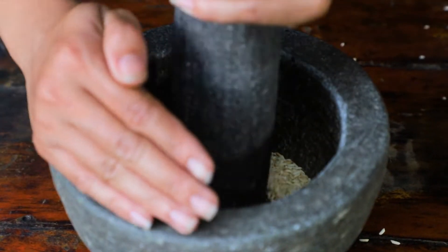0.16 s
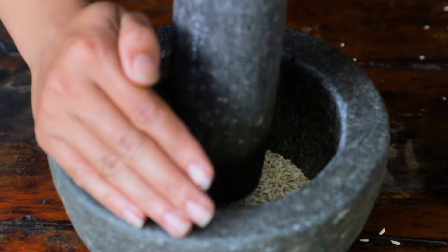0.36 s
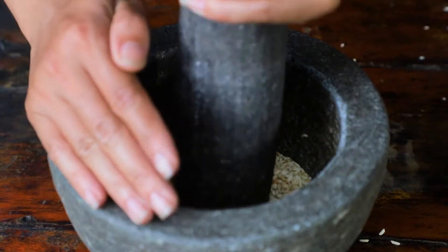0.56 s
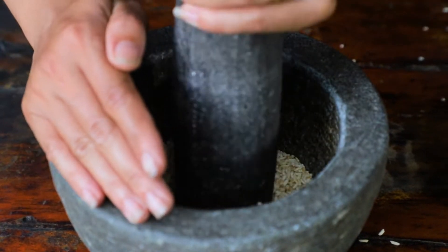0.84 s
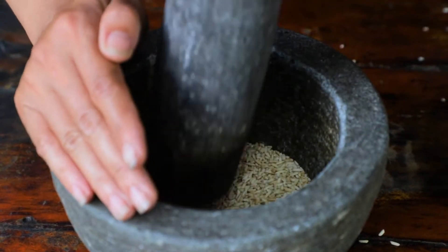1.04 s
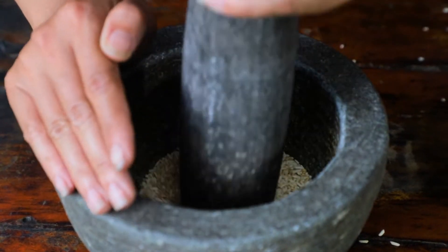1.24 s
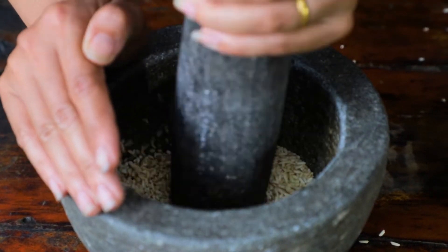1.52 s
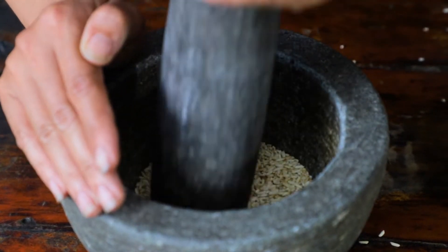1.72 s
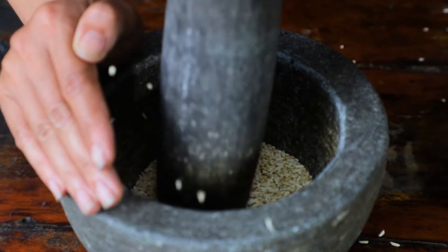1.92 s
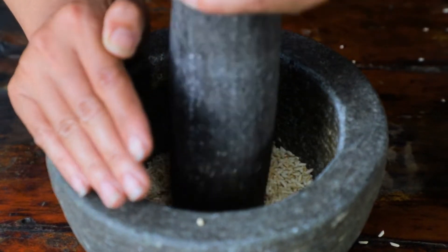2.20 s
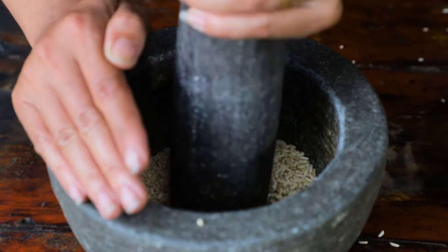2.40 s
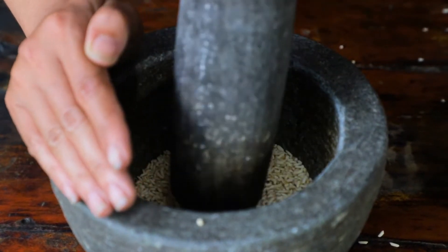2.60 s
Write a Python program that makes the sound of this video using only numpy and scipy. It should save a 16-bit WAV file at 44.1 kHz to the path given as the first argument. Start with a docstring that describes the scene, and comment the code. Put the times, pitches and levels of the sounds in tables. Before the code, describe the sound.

A stone pestle pounds dry grain in a stone mortar, three gritty thuds a second, with two sharp hollow clacks, small clinks and low wind thumps on a close microphone, slight short room echo.

```python
"""A stone pestle pounds dry grain in a stone mortar on a wooden table, about three blows a second, close by.
Each blow mixes a crackle of breaking grain with jolts that ring mortar, table and pestle.
Wind thumps the microphone as filtered clicks and single puffs, over a flickering noise hiss with small drops.
Something hard and hollow clacks nearby and something smaller clinks, as noise snaps with decaying modes.
Stray grains tick as short tones; the knocks get a short room echo, and the loudest hits overload the input."""
import sys
import numpy as np
from scipy import signal
from scipy.fft import rfft, irfft
from scipy.io import wavfile

SR = 44100
rng = np.random.default_rng(int(sys.argv[2]) if len(sys.argv) > 2 else 0)


def bounce(signal):
    """Save signal as a 16-bit WAV file at the path given by the first command-line argument."""
    frames = np.transpose(np.atleast_2d(signal))
    limited = np.clip(frames, -1, 1)
    pcm = np.round(limited * 32767).astype(np.int16)
    wavfile.write(sys.argv[1], SR, pcm)


def boost_factor(decibels):
    """Convert a level in decibels to a linear amplitude factor."""
    exponent = np.asarray(decibels, float) / 20
    return 10 ** exponent


N = 121275
LEAD = 4096  # samples made before time 0, so that a blow can already be under way
T = np.arange(-LEAD, N) / SR


def level(x, db):
    """Scales a sound to an rms level in dB."""
    return x * boost_factor(db) / np.sqrt(np.mean(x ** 2))


def colour(x, points):
    """Filters a sound along a curve of (Hz, dB) points."""
    hz, db = np.array(points, float).T
    f = np.fft.rfftfreq(len(x), 1 / SR) + 1
    gain = boost_factor(np.interp(np.log(f), np.log(hz), db))
    return irfft(rfft(x) * gain, len(x))


def ring(hz, db, t60, size=8192):
    """Response of a set of decaying modes to one tap; t60 is the time in seconds to fade by 60 dB."""
    t = np.arange(size) / SR
    hz, db, t60 = (np.reshape(v, (-1, 1)) for v in (hz, db, t60))
    decay = np.exp(-np.log(1000) * t / t60)
    return (boost_factor(db) * np.sin(2 * np.pi * hz * t) * decay).sum(axis=0)


def clicks(rate, spread_db, size):
    """Clicks of either sign at random moments, rate per second, with random sizes."""
    when, sign, big = rng.random((3, size))
    sizes = boost_factor(-spread_db * np.log(1 - big))
    return (when < rate / SR) * np.sign(sign - .5) * sizes


def add(out, s, x):
    """Mixes x into out from time s in seconds."""
    i = int(round(s * SR)) + LEAD
    out[i:i + len(x)] += x[:len(out) - i]


# The blows of the pestle. Each row: start in seconds, length of the crush in seconds, crackle level in dB
# before the press shapes it, thud level in dB rms, peak of the pestle's ring in dB.
BLOWS = [(-.045, 0.02, -28, -21, -42), (0.262, 0.028, -28, -16, -21.5), (0.58, 0.027, -28, -15, -20.5),
         (0.888, 0.029, -27.5, -19, -29), (1.221, 0.024, -22.5, -14.5, -26), (1.572, 0.025, -27, -14, -44),
         (1.86, 0.021, -25.5, -12.5, -17), (2.188, 0.011, -21.5, 4, -19), (2.487, 0.029, -27, -19.5, -28)]
# The tone of breaking grain, also used for the snap of a knock. Each row: frequency in Hz, relative level in dB.
CRUNCH = [(880, -4), (1500, -18), (2100, -11.5), (2760, -2), (3400, -1.5), (3800, -6.5), (4200, -5),
          (5000, -4.5), (6690, -11.5), (8770, -10), (12200, -14.5), (15200, -12), (16300, -42)]
# The ways mortar and table ring. Each row: frequency in Hz, relative level in dB, fade time t60 in seconds.
MORTAR = [(140.2, -0.5, 0.11), (233.4, -0.5, 0.056), (307.5, 5.5, 0.04), (380.4, 6, 0.035),
          (429, -4.5, 0.066), (575, -11.5, 0.11), (661, -10.5, 0.063), (774, -15.5, 0.15),
          (895, -11.5, 0.076), (970, -9.5, 0.065), (1171, -10.5, 0.09), (1304, -11, 0.089)]
CRUSH_RISE_S, CRUSH_FALL_S = 0.011, 0.004
CRUSH_SAG = 0.15  # share of the crackle lost while pressing
SETTLE_S, SETTLE_DB = 0.022, -7.5  # slower tail of settling grain
LUMP_DB = 3.5  # grains give way in lumps
CRACKS_PER_S, CRACK_SPREAD_DB = 5000, 0.5
JOLTS_PER_S, JOLT_SPREAD_DB, THUD_LATE_S = 2200, 1.5, 0.0065
SINK, ROCK = 0.6, 0.61  # shares of the crush: jolts grow over the first, then die away at the pace of the second
DETUNE = 0.041  # each tone of a mode's group is detuned at random by about this share, roughening the thud
BITE, SOFT_DB = 0.38, -10  # thuds above SOFT_DB reach stone: dB per octave brighter for each dB above
PESTLE_HZ, PESTLE_T60_S = 4120, 0.06


def grain_crush(t, after, length, crunch_db):
    """Grain cracks at random moments while the pestle presses in, then settles; after is time since the crush."""
    rise = np.minimum(t / min(CRUSH_RISE_S, length / 2), 1) ** 2
    press = rise * (1 - CRUSH_SAG * np.minimum(t / length, 1))
    crush = press * (np.exp(-after / CRUSH_FALL_S) + boost_factor(SETTLE_DB) * np.exp(-after / SETTLE_S))
    knots = t[::128]
    lumps = np.interp(t, knots, rng.standard_normal(len(knots)))
    cracks = clicks(CRACKS_PER_S, CRACK_SPREAD_DB, size=len(t))
    return crush * boost_factor(LUMP_DB * lumps) * level(colour(cracks, CRUNCH), crunch_db)


def mortar_thud(t, jolts, length, thud_db):
    """Jolts set off the modes of mortar and table; a harder blow excites more of the high ones."""
    hz, db, t60 = np.repeat(MORTAR, 6, axis=0).T  # each mode is a close group of six tones
    bite = BITE * max(thud_db - SOFT_DB, 0) * np.log2(hz / hz[0])
    detune = 1 + DETUNE * rng.standard_normal(len(hz))
    thud = signal.fftconvolve(jolts, ring(hz * detune, db + bite, t60))[:len(t)]
    thud = signal.sosfilt(signal.butter(2, 90, "high", fs=SR, output="sos"), thud)
    return thud * boost_factor(thud_db) / np.sqrt(np.mean(thud[t < length + .02] ** 2))


def pestle_ring(t, jolts, length, ring_db):
    """The jolts during the crush make the pestle ring thinly at one pitch."""
    pestle = signal.fftconvolve(jolts * (t < length), ring(PESTLE_HZ, 0, PESTLE_T60_S))[:len(t)]
    return pestle * boost_factor(ring_db) / np.abs(pestle).max()


def blows():
    """Each blow cracks grain as the pestle sinks in, and its uneven jolts shake mortar, table and pestle."""
    out, t = np.zeros(len(T)), np.arange(8192) / SR
    for s, length, crunch_db, thud_db, ring_db in BLOWS:
        after = np.maximum(t - length, 0)
        crunch = grain_crush(t, after, length, crunch_db)
        sunk = np.clip((t - min(THUD_LATE_S, length / 4)) / (SINK * length), 0, 1)
        rocking = np.exp(-after / (ROCK * length))
        jolts = sunk * rocking * clicks(JOLTS_PER_S, JOLT_SPREAD_DB, size=len(t))
        thud = mortar_thud(t, jolts, length, thud_db)
        add(out, s, crunch + thud + pestle_ring(t, jolts, length, ring_db))
    return out


# Strong puffs of wind. Each row: time in seconds, size in dB, half width in seconds, push +1 or pull -1.
PUFFS = [(1.002, -15.5, 0.0068, 1), (1.089, -7, 0.0028, 1), (1.108, -5.5, 0.0044, 1),
         (1.13, -14, 0.0029, 1), (1.169, -8, 0.0037, 1), (1.208, -16, 0.015, -1), (1.34, -18, 0.0093, 1),
         (1.408, -11.5, 0.0063, -1), (1.508, -10, 0.0046, 1), (1.648, -12.5, 0.0062, 1),
         (1.846, -7.5, 0.005, 1), (1.965, -21, 0.0055, -1), (2.007, -6, 0.0026, 1), (2.058, -14, 0.0034, 1),
         (2.097, -11, 0.003, 1), (2.163, -11.5, 0.0033, 1), (2.179, -16, 0.0065, 1),
         (2.721, -17.5, 0.0057, -1)]
# The strength of the gust over time. Each row: time in seconds, level in dB before the brightening.
GUST = [(0, -26), (.3, -29), (.6, -30), (.85, -29), (.97, -23.5), (1.15, -20), (1.35, -19.5), (1.6, -34),
        (1.7, -31), (1.82, -32.5), (1.9, -13.5), (2.1, -24), (2.25, -24), (2.4, -34), (2.65, -34.5),
        (2.75, -34.5)]
# The tone of the wind. Each row: frequency in Hz, relative level in dB.
WIND = [(12, -33), (25, 2.5), (55, -2.5), (110, -8), (200, -16.5), (330, -33.5), (600, -63)]
EDDIES_PER_S, EDDY_SPREAD_DB = 180, 1.5
BRIGHTEN = 0.3  # dB lost above 100 Hz for each dB the gust is below its strongest


def wind():
    """Eddies thump the microphone, sharper in a stronger gust; the strong puffs push or pull, then swing back."""
    eddies = level(colour(clicks(EDDIES_PER_S, EDDY_SPREAD_DB, size=len(T)), WIND), 0)
    sharp = colour(eddies, [(50, -30), (100, 0)])
    gust_db = np.interp(T, *np.array(GUST).T)
    brightness = boost_factor(BRIGHTEN * (gust_db - gust_db.max()))
    out = boost_factor(gust_db) * (eddies - sharp + sharp * brightness)
    for s, db, width, way in PUFFS:
        u = (T - s) / width
        out += way * boost_factor(db) * (1 - u ** 2 - 0.18 * u) * np.exp(-u ** 2 / 2)
    return out


def pips(rows, t60, octaves, count):
    """Short grains of sound (s, dB, Hz), each of count decaying tones scattered round its pitch."""
    out = np.zeros(len(T))
    rise = np.minimum(np.arange(512) / 30, 1)
    for s, db, hz in rows:
        tones = np.minimum(hz * 2 ** (octaves * rng.standard_normal(count)), .4 * SR)
        add(out, s, rise * ring(tones, db, t60, size=512) / np.sqrt(count))
    return out


# The tone of the trickling hiss. Each row: frequency in Hz, relative level in dB.
HISS = [(240, -13), (400, -4), (570, -13), (719, -8), (893, -11), (1250, -3), (1950, -18), (2600, -8),
        (3310, -5.5), (6640, -18), (7170, -23), (16000, -35)]
HISS_DB, FLICKER_DB = -44.5, 3  # rms level before the flicker, and how far each band wanders
DROPS_PER_S, DROP_DB, DROP_T60_S = 260, -29.5, 0.004  # DROP_DB: the loudest drops


def trickle():
    """Filtered noise whose half-octave bands flicker separately, with small drops as short tones in it."""
    out, f = np.zeros(len(T)), np.fft.rfftfreq(len(T), 1 / SR)
    hiss = rfft(level(colour(rng.standard_normal(len(T)), HISS), HISS_DB))
    for lo in 100 * 2 ** np.arange(0, 8, .5):
        knots = rng.standard_normal(60)
        flicker = np.interp(T, np.linspace(T[0], T[-1], len(knots)), knots)
        band = irfft(hiss * (f >= lo) * (f < lo * np.sqrt(2)), len(T))
        out += boost_factor(FLICKER_DB * flicker) * band
    when, big, pitch = rng.random((int(DROPS_PER_S * N / SR), 3)).T
    drops = zip(when * N / SR, DROP_DB - 10 * big, 2500 * 2 ** (1.2 * pitch ** 2))
    return out + pips(drops, DROP_T60_S, 0, count=1)


BRIGHT_HZ = 2000  # modes above this follow the brightness and scatter in pitch
SNAP_S, CONTACT_S, LOW_CUT_HZ = 0.0025, 0.0026, 860


def knock(bright_db, share, spacing_hz, snap_db, cluster, modes):
    """A noise snap with a weak tail, and modes in close threes, all rising over the contact of two hard things."""
    t = np.arange(8192) / SR
    hz, db, t60 = np.repeat(modes, 3, axis=0).T
    high = hz > BRIGHT_HZ
    fade = np.exp(-t / SNAP_S) + boost_factor(-19) * np.exp(-t / 0.024)
    snap = boost_factor(snap_db) * fade * level(colour(rng.standard_normal(len(t)), CRUNCH), 0)
    scattered = cluster * hz * rng.standard_normal(len(hz))
    spaced = spacing_hz * (np.arange(len(hz)) % 3 - 1)
    body = ring(hz + np.where(high, scattered, spaced), db + bright_db * high, share * t60)
    return np.minimum(t / CONTACT_S, 1) * (snap + body / 2)


def cut_lows(x):
    """Thins a knock below LOW_CUT_HZ."""
    return signal.sosfilt(signal.butter(2, LOW_CUT_HZ, "high", fs=SR, output="sos"), x)


# The clacks. Each row: time in seconds, level in dB, brightness in dB, share of the free ring time,
# spacing in Hz of the three close tones in each low mode.
CLACKS = [(0.488, -1, 5.5, 0.72, 25), (0.672, -28, -6, 1.1, 49), (2.434, 1, 6, 0.71, 10.4),
          (2.604, -21, 5, 0.69, 16.5)]
# The ways the hollow thing rings. Each row: frequency in Hz, relative level in dB, free fade time t60 in seconds.
HOLLOW = [(1376, 3, 0.077), (1380, -36, 0.11), (2940, -21, 0.054), (3545, -31, 0.05), (4067, -23.5, 0.086),
          (4987, -24.5, 0.079), (6044, 5.5, 0.0057), (6440, -23.5, 0.093), (7450, -3, 0.012),
          (7610, -26.5, 0.17), (11270, -36.5, 0.1), (14600, -27, 0.065)]
TABLE_HZ, TABLE_DB, TABLE_T60_S = 182, -27.5, 0.03  # the table's level is relative to the clack


def clacks():
    """Something hard and hollow is knocked: a snap and ringing modes, with a thump of the table under each."""
    out = np.zeros(len(T))
    for s, hit_db, bright_db, share, spacing_hz in CLACKS:
        add(out, s, boost_factor(hit_db) * knock(bright_db, share, spacing_hz, -14 + bright_db, 0.007, HOLLOW))
    out = cut_lows(out)
    for s, hit_db, *_ in CLACKS:
        add(out, s, ring(TABLE_HZ, hit_db + TABLE_DB, TABLE_T60_S))
    return out


# Drier clinks of something smaller. Each row: time in seconds, level in dB.
CLINKS = [(0.691, -16.5), (.757, -4.5), (1.697, -26.5)]
# The ways the smaller thing rings. Each row: frequency in Hz, relative level in dB, fade time t60 in seconds.
SMALL = [(1366, -8, .025), (2600, -11, .018), (3136, -17, .05), (4300, -4, .02), (5750, -3, .018),
         (6500, -7, .016), (7740, -14, .03)]


def clinks():
    """Something smaller is knocked: its modes mostly fade sooner and scatter more widely in pitch."""
    out = np.zeros(len(T))
    for s, hit_db in CLINKS:
        add(out, s, boost_factor(hit_db) * knock(0, 1, 40, -15.5, 0.04, SMALL))
    return cut_lows(out)


# Stray grains. Each row: time in seconds, level in dB, central pitch in Hz.
TICKS = [(1.658, -35, 3100), (1.272, -24, 9000), (2.2, -30, 5100), (1.812, -35, 7800), (2.5, -22, 11900),
         (2.224, -15.5, 12500), (3.6, -22.5, 3520), (.869, -33, 3000)]


def stray_grains():
    """Each stray grain ticks as six short tones scattered by about a tenth of an octave."""
    return pips(TICKS, t60=0.013, octaves=0.098, count=6)


ROOM_DB, ROOM_T60_S, ROOM_HZ = -25, 0.21, 2870  # the echo dulls above ROOM_HZ


def room_echo(knocks):
    """The room returns the knocks as a decaying wash of filtered noise, from 4 ms on."""
    t = np.arange(SR // 2) / SR
    wash = colour(rng.standard_normal(len(t)), [(ROOM_HZ, 0), (16000, -14)])
    echo = wash * np.exp(-np.log(1000) * t / ROOM_T60_S) * (t > .004)
    echo /= np.sqrt(np.sum(echo ** 2))
    return boost_factor(ROOM_DB) * signal.fftconvolve(knocks, echo)[:len(T)]


def scene():
    """Knocks with their short room echo, plus hiss and wind, as one channel."""
    knocks = blows() + clacks() + clinks() + stray_grains()
    return (knocks + room_echo(knocks) + trickle() + wind())[None, LEAD:]


def band_limit(x):
    """A steep low-pass at the top of the band."""
    return signal.sosfilt(signal.butter(12, 16780, fs=SR, output="sos"), x)


def record(dry):
    """The input clips at full scale; a steep filter cuts the treble above 16 kHz."""
    clipped = np.clip(dry, -1, 1)
    top = signal.ellip(12, .2, 100, 16000, fs=SR, output="sos")
    mix = signal.sosfilt(top, clipped)
    return band_limit(mix)


dry = scene()
out = record(dry)
bounce(out)
```